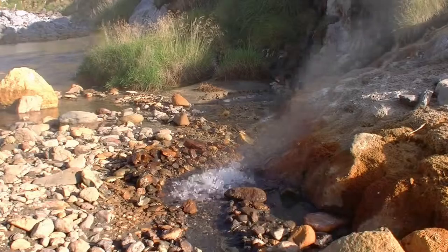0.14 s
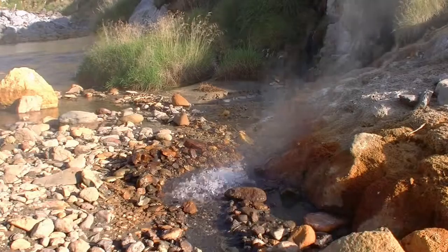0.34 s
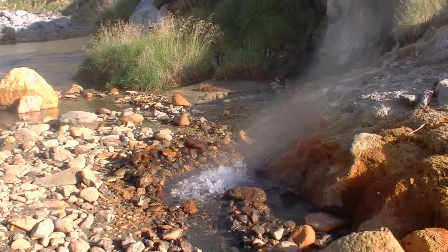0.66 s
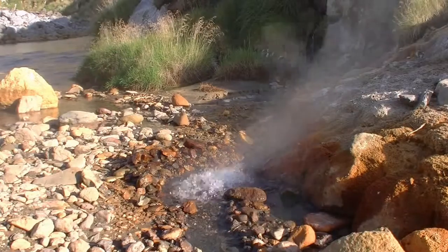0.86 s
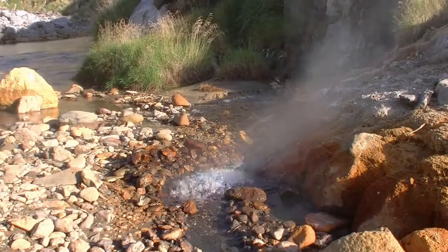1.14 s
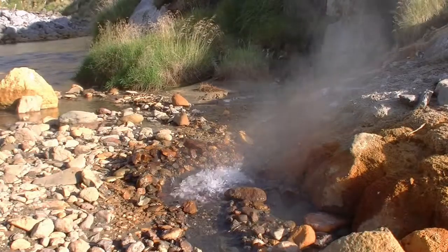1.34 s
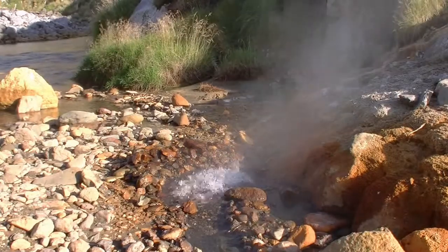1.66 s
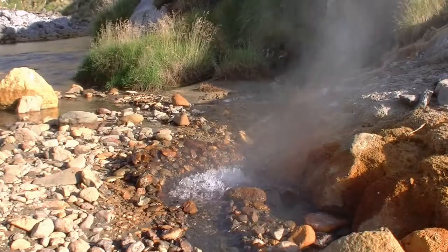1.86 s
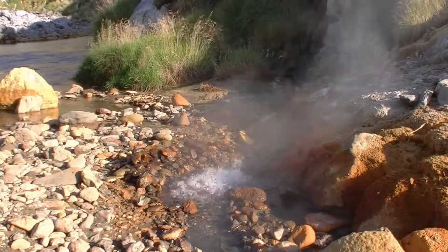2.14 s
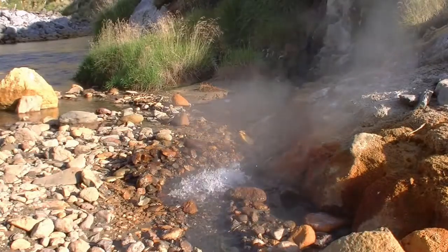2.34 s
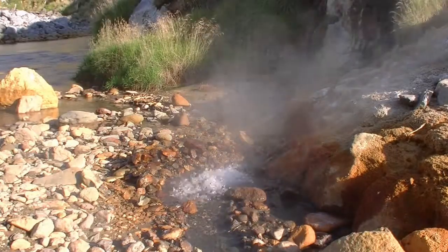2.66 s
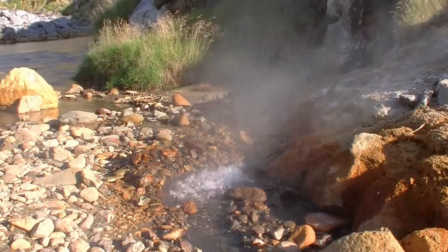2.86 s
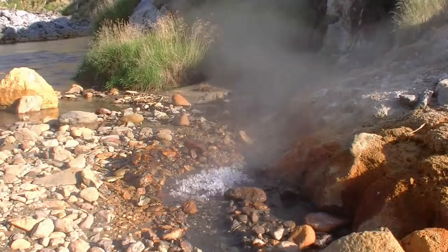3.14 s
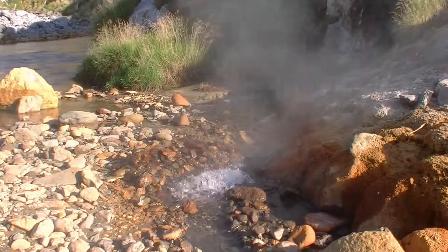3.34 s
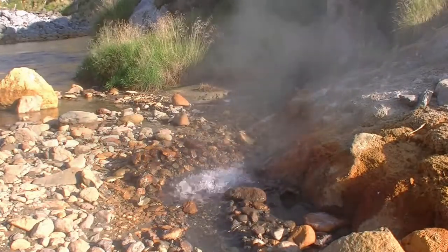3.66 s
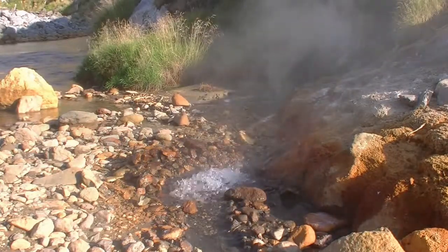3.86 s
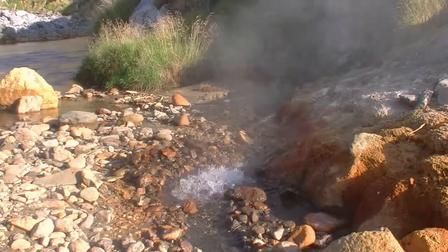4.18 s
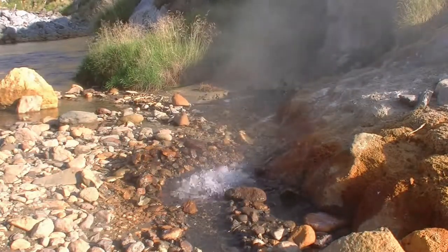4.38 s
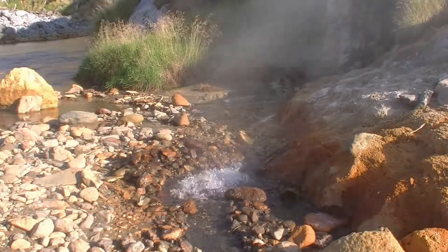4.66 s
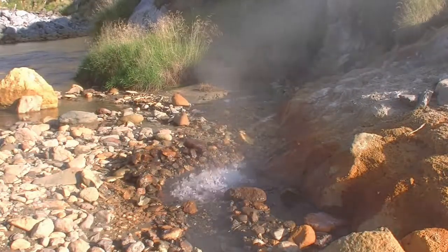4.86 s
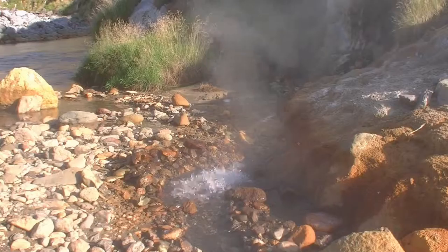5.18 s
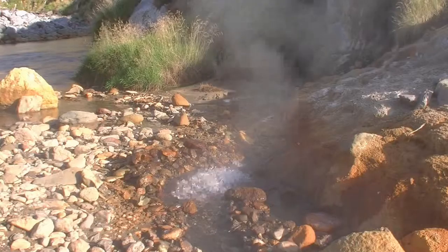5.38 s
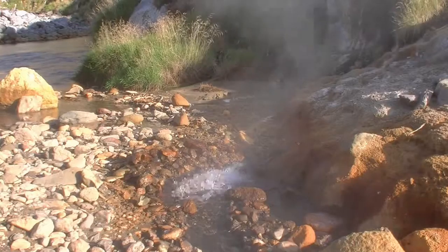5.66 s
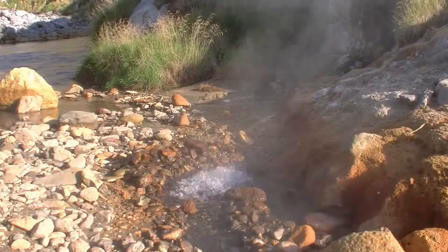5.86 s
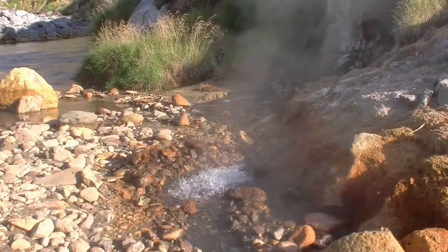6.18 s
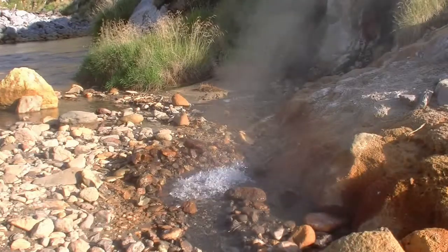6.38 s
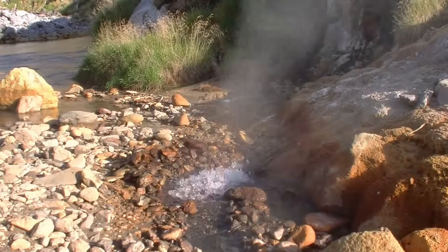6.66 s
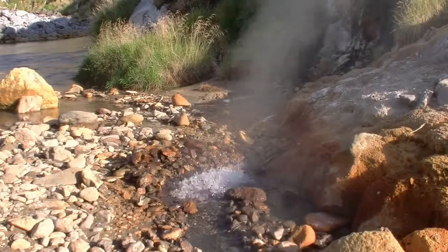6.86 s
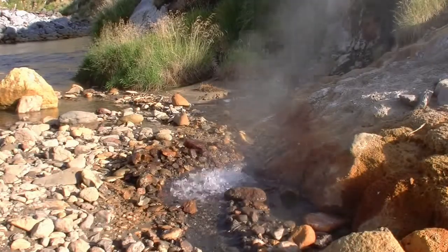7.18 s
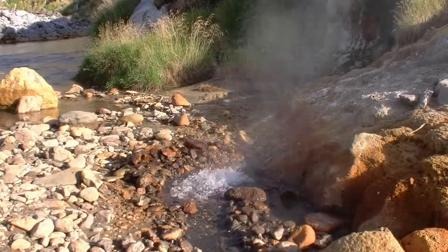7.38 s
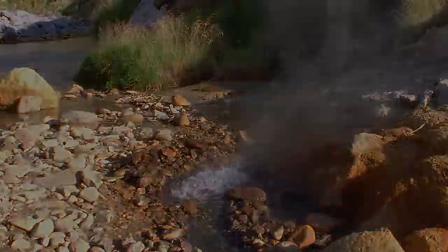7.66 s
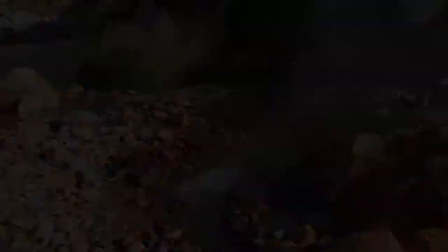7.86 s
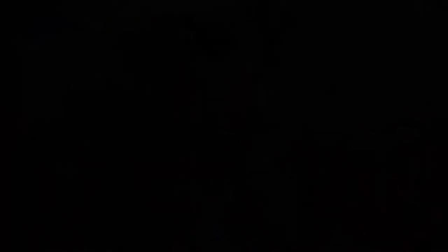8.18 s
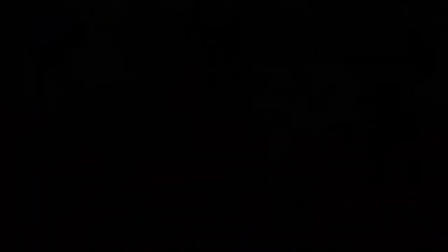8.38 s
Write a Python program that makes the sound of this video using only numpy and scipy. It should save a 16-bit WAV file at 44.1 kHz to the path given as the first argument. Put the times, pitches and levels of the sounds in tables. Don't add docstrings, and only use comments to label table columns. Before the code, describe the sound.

A hot spring boils among gravel outdoors, heard close in wide stereo. A steady, dense mid-pitched churn flutters quickly, with irregular hollow gulps popping across both sides, fizzing splashes, droplet plinks and tiny crisp spits on stone. A faint low wind brush touches the microphone at the very start. The boil stays even, then fades smoothly to silence over the last second.

```python
import sys
import numpy as np
from scipy import signal
from scipy.fft import rfft, irfft
from scipy.io import wavfile
from scipy.ndimage import uniform_filter1d

SR = 44100
rng = np.random.default_rng(int(sys.argv[2]) if len(sys.argv) > 2 else 0)


def pcm_store(signal):
    levels = np.round(np.clip(np.atleast_2d(signal), -1, 1) * 32767)
    wavfile.write(sys.argv[1], SR, levels.astype(np.int16).T)


def natural_amplitude(level_db):
    exponent = np.asarray(level_db, float) / 20
    return 10 ** exponent


N = 376173

# (time of the middle [s], peak level [dB], pitch [Hz], bearing [degrees], length [cycles])
BIG_BUBBLES = [(0.341, -14, 520.0, 60, 6.6), (0.359, -8.5, 500.0, 112, 5.2), (0.786, -17, 500.0, 59, 3.9),
               (0.806, -17, 617, 127, 9), (0.914, -13, 620.0, 85, 4.7), (1.093, -15.5, 550.0, 96, 7.6),
               (1.2, -23, 550.0, 152, 3.6), (1.214, -17, 520, 130, 7.7), (1.563, -23, 543, 180, 4.7),
               (2.144, -16.5, 530.0, 120, 9), (2.157, -8.5, 600.0, 110, 6.9), (2.42, -16, 654, 113, 10.3),
               (2.483, -11, 537, 90, 4.9), (2.772, -17, 550, 140, 7.1), (2.801, -20, 580.0, 150, 7.1),
               (2.893, -7.5, 655, 120, 7.2), (3.65, -13, 700, 140, 4.5), (3.813, -30, 720.0, 65, 6.6),
               (3.892, -13, 500.0, 69, 2.7), (3.941, -20, 540.0, 160, 5.7), (4.517, -15.5, 520.0, 41, 8.1),
               (4.806, -14, 527, 40, 5.5), (4.854, -17, 600.0, 125, 6.8), (5.329, -15, 730.0, 116, 6.8),
               (5.591, -18.5, 574, 170, 4.4), (5.625, -17, 600.0, 20, 4.3), (5.778, -22, 490.0, 64, 5.8),
               (5.8, -23, 487, 72, 7.7), (5.926, -17, 530.0, 96, 9), (6.176, -17.5, 500.0, 52, 9),
               (6.201, -19, 534, 180, 7.7), (6.442, -13, 578, 113, 5), (6.488, -20.5, 540.0, 120, 7),
               (6.668, -20, 490.0, 109, 4.7), (7.005, -19.5, 563, 180, 4.1), (7.137, -15, 540.0, 82, 4),
               (7.242, -16, 456, 115, 5.1), (7.318, -19, 686, 4, 9), (7.409, -13, 550.0, 110, 3.6),
               (7.764, -13, 460.0, 110, 5.1)]
# (time of the middle [s], peak level [dB], pitch [Hz])
CENTRAL_BUBBLES = [(0.127, -29, 506), (0.24, -21, 517), (0.296, -24, 500), (0.404, -22, 500),
                   (0.576, -23.5, 506), (1.857, -26, 530), (1.953, -24, 600), (2.181, -25, 500),
                   (2.715, -21, 620), (2.749, -27, 524), (3.922, -23, 530), (4.182, -26, 590),
                   (4.585, -25, 490), (4.742, -25, 543), (4.823, -22, 560), (4.879, -23, 540),
                   (5.1, -29, 590), (5.497, -22, 510), (5.529, -27, 540), (5.666, -30, 490),
                   (5.811, -23, 565), (6.05, -28, 533), (6.081, -23, 455), (6.228, -21, 500),
                   (6.389, -27, 540), (6.574, -24, 530), (6.769, -21, 580), (6.829, -25, 507),
                   (7.342, -21, 540), (7.633, -20, 555)]


def rms_one(x):
    return x / np.sqrt(np.mean(x ** 2) + 1e-20)


def in_time(rows):
    s, *columns = np.transpose(rows)
    return [np.interp(np.arange(N) / SR, s, c) for c in columns]


def at_hz(rows, hz, order=1):
    rows = np.array(rows)
    return np.interp(np.log(hz), np.log(rows[:, 0]), rows[:, order])


def drift(rate_hz):
    pole = np.exp(-80 * np.pi * rate_hz / SR)
    noise = rng.standard_normal(N // 40 + 2002)
    slow = signal.lfilter([1], [1, -2 * pole, pole * pole], noise)[2000:]
    return np.interp(np.arange(N) / 40, np.arange(len(slow)), rms_one(slow))


def band(x, low_hz, high_hz):
    return signal.sosfilt(signal.butter(2, [low_hz, high_hz], "band", fs=SR, output="sos"), x + 1e-18)


def colour(x, gain):
    return irfft(rfft(x, 2 * len(gain) - 2) * gain)[..., :N]


def pool():
    # (frequency [Hz], density [dB per Hz])
    mid_colour = [(25, -59), (70, -39), (150, -18), (230, -10), (285, -4.5), (520, 0), (750, -3.5),
                  (840, -8.5), (1200, -13), (1320, -16.5), (1900, -18), (2200, -16.5), (3000, -17),
                  (3400, -20.5), (4300, -27), (5500, -23.5), (8900, -27), (9700, -30.5), (14100, -38.5),
                  (15800, -44)]
    # (frequency [Hz], density [dB per Hz])
    side_colour = [(25, -56), (65, -56), (261, -8.5), (498, 0.5), (1210, -9), (2500, -23.5), (3600, -33),
                   (5300, -41.5), (5800, -100), (7200, -77), (7700, -50), (9600, -41), (13700, -44),
                   (15800, -48)]
    # (frequency [Hz], share [-1..1])
    in_phase = [(60, -0.12), (160, -0.41), (400, -0.019), (1400, 0.14), (1850, -0.35), (2500, .12),
                (4300, 0.27), (8000, .1), (10000, 0.67), (12000, 0.68), (15000, 0.86)]
    # (frequency [Hz], share [-1..1])
    quarter_cycle = [(100, -.15), (190, -.15), (260, .18), (390, -.05), (690, 0.17), (1400, -.1),
                     (1750, -.08), (2070, .27), (2600, -.05), (3450, -.36), (4300, -.04), (9000, .13),
                     (15000, .05)]

    hz = np.maximum(np.fft.rfftfreq(2 ** 19, 1 / SR), 1)
    front, other = swarm()
    coherence = np.clip(at_hz(in_phase, hz), -0.99, 0.99) + 1j * at_hz(quarter_cycle, hz)
    independent = np.sqrt(np.maximum(1 - abs(coherence) ** 2, 0))
    side_gain = natural_amplitude(at_hz(side_colour, hz) + 5.5)
    mid = colour(front, natural_amplitude(at_hz(mid_colour, hz)))
    side = colour(front, side_gain * coherence) + colour(other, side_gain * independent)
    return np.array([mid + side, mid - side]) * natural_amplitude(-29.5) / np.std(mid)


def swarm():
    # (frequency [Hz], rate [collapses per s in a third octave], size spread [dB], flicker [dB])
    bubble_sizes = [(59.9, 900, 0, 1.3), (500, 2200, 0.68, -0.1), (1996, 4500, 1.5, 0.62),
                    (5023, 5500, 1, 0.71), (14050, 8000, -1.5, 0.8)]
    layer_hz = [600, 2300, 7000]

    levels = effort_db()
    levels[0] += swell_at_gulps()
    surge = 0.14 * drift(15) + 0.53 * drift(25) + 0.17 * drift(120)
    edges_hz = 32 * 2 ** (np.arange(28) / 3)
    near = drift(22)
    out = 0
    for low, high in zip(edges_hz, edges_hz[1:]):
        hz = np.sqrt(low * high)
        born = np.cumsum(rng.exponential(1, N // 4) * SR / at_hz(bubble_sizes, hz)).astype(int)
        born = born[born < N]
        directions = rng.standard_normal((len(born), 2))
        excess = np.minimum(rng.exponential(1, len(born)), 5)
        strength = natural_amplitude(at_hz(bubble_sizes, hz, order=2) * excess)
        clicks = np.zeros((2, N))
        clicks[:, born] = (directions * strength[:, None]).T

        place = np.interp(np.log(hz), np.log(layer_hz), range(3))
        level_db = sum(np.clip(1 - abs(place - k), 0, 1) * levels[k] for k in range(3))
        near = 0.72 * near + 0.59 * drift(22)
        shake_db = at_hz(bubble_sizes, hz, order=3) * (near + surge)
        ringing = rms_one(band(clicks, low, high))
        out = out + np.sqrt(high - low) * ringing * natural_amplitude(level_db + shake_db)
    return out


def effort_db():
    # (time [s], level [dB])
    boil = [(0, -31.5), (.33, -31.5), (.55, -31), (.8, -30.5), (1.4, -32), (1.55, -30.5), (2.3, -31),
            (2.8, -30), (3.25, -32.5), (3.95, -30), (4.3, -30.5), (4.8, -30), (5.15, -31.5), (5.65, -29),
            (6.0, -31.5), (6.2, -30), (6.75, -30.5), (7.35, -29.5), (7.6, -32), (8.4, -28)]
    boil_share = [0.81, 0.26, 0.12]
    # (time of the top [s], extra level [dB])
    splashes = [(0.03, 0.5), (0.17, 1), (0.3, 1), (0.44, 1.5), (0.6, 1.5), (1.85, 2.5), (2.3, -1.3),
                (2.9, -1.4), (3.5, 0.3), (4.5, 1), (5.4, 1.2), (6.8, -1.3), (7.95, 1), (0.8, 5.5),
                (1.05, 3), (1.2, 2.5), (1.4, 4.5), (1.62, 2), (2.1, 1.5), (2.55, 3), (3.2, 0.5),
                (3.85, 1.5), (4.2, 1.5), (4.8, 2), (5.06, 2.5), (5.72, 1), (5.96, 3), (6.16, 2.5),
                (6.458, 2.3), (7.1, 0.4), (7.368, 0), (7.7, 0)]
    splash_share = [0.11, 0.46, 0.61]
    # (time of the top [s], extra level [dB])
    spray_jets = [(0.53, 2.5), (1.02, 0.5), (1.18, 1.5), (1.58, -1), (1.67, 2.5), (2.18, 1), (2.47, 1.5),
                  (3.85, 1.5), (5.01, 1.5), (5.24, 0), (5.695, 1.5), (5.745, 5), (5.97, -1.5), (6.35, 1.5),
                  (7.15, 1)]
    rise_s, fall_s, jet_s = 0.12, 0.11, 0.015

    vigour = in_time(boil)[0]
    t = np.arange(0, N, 64) / SR
    thrown = sum(db * np.exp(-((t - s) / np.where(t < s, rise_s, fall_s)) ** 2) for s, db in splashes)
    jets = sum(db * np.exp(-((t - s) / jet_s) ** 2) for s, db in spray_jets)
    thrown = np.interp(np.arange(N) / SR, t, thrown - thrown.mean())
    jets = np.interp(np.arange(N) / SR, t, jets)
    swing = np.outer(boil_share, vigour - vigour.mean())
    return swing + np.outer(splash_share, thrown) + np.outer([0, 0.27, 1.1], jets)


def swell_at_gulps():
    lift_db, lift_s = 1.5, 0.0059
    marks = np.zeros(N)
    marks[[int(row[0] * SR) for row in BIG_BUBBLES + CENTRAL_BUBBLES]] = 1
    t = np.arange(-1500, 1501) / SR
    bell = np.exp(-(t / lift_s) ** 2)
    return lift_db * np.minimum(signal.fftconvolve(marks, bell, "same"), 1)


def gulps():
    out = np.zeros((2, N))
    for s, peak_db, hz, bearing, cycles in all_gulps():
        mid, side = np.cos(np.radians(bearing)), np.sin(np.radians(bearing))
        pop = burst(hz, max(cycles, 1), rise=0.053)
        pair = natural_amplitude(peak_db - 2.5) * np.outer([mid + side, mid - side], pop)
        add(out, s - 0.329 * len(pop) / SR, pair)
    return band(out, 150, 4500)


def all_gulps():
    # (time of the middle [s], peak level [dB], pitch [Hz])
    deep_bubbles = [(1.005, -30, 278), (1.154, -30.5, 280), (1.846, -36, 310), (2.217, -33, 296),
                    (3.997, -33, 306), (4.192, -37, 300), (4.237, -32, 290), (4.492, -31, 292),
                    (4.787, -32, 288), (5.271, -31, 300), (5.361, -41, 308), (5.425, -33, 310),
                    (6.178, -36, 290), (6.477, -39, 300), (6.912, -34, 284), (7.143, -35, 286),
                    (7.515, -37, 290), (7.837, -29, 300), (7.922, -33, 290), (8.017, -34, 280)]
    # (time [s], peak level [dB], pitch [Hz])
    droplets = [(0.0927, -30, 1430), (0.1705, -29, 2780), (0.5033, -28, 2240), (0.816, -27, 2680),
                (0.8709, -28, 2220), (1.2062, -26, 2670), (1.2496, -28, 2920), (1.3887, -24, 2050),
                (1.5484, -26, 2960), (1.5828, -30, 1360), (1.5998, -26, 2620), (1.6437, -28, 1980),
                (1.7195, -31, 2560), (1.7514, -28, 2710), (1.8253, -26, 2090), (2.588, -31, 2370),
                (2.7716, -28, 2650), (2.9991, -33, 1660), (3.7618, -25, 2630), (3.8586, -28, 1330),
                (4.0307, -28, 1510), (4.2951, -27, 2730), (4.3316, -25, 2170), (4.4099, -27, 2240),
                (4.5276, -28, 2250), (4.632, -26, 2220), (4.6927, -23, 2240), (4.798, -31, 2200),
                (4.8973, -31, 2250), (4.9686, -32, 2410), (5.0315, -31, 2210), (5.1178, -27, 2050),
                (5.2006, -30, 2980), (5.5458, -29, 2810), (5.7369, -26, 2790), (5.902, -29, 3260),
                (5.941, -28, 1410), (6.3121, -27, 1800), (6.3699, -24, 1720), (6.4233, -20, 2200),
                (6.4787, -26, 2350), (6.7615, -24, 2220), (7.0708, -31, 1360), (7.0988, -30, 2700),
                (7.2893, -29, 2210)]

    rows = list(BIG_BUBBLES)
    # rows, trim [dB], length [cycles]
    for kind, trim_db, cycles in [(CENTRAL_BUBBLES, 2, 5.62), (deep_bubbles, 4.5, 8.96), (droplets, -4.5, 5.5)]:
        rows += [(s, db + trim_db, hz, 0, cycles) for s, db, hz in kind]
    return rows


def burst(hz, cycles, rise):
    u = np.linspace(0, 1, int(cycles / hz * SR) + 2)
    swell = np.sin(np.pi * u ** 0.52) ** 2
    return swell * np.sin(2 * np.pi * cycles * (u + rise * (u * u - u)))


def add(out, s, pair):
    i = round(s * SR)
    out[:, i:i + pair.shape[1]] += pair


def spits():
    # (time [s], peak level [dB], pitch [Hz])
    stone_drops = [(0.3568, -26.5, 6100.0), (0.3849, -30, 7100.0), (0.5062, -25, 5800.0),
                   (0.6627, -30, 6500.0), (0.779, -27, 7100.0), (0.8558, -27, 7700.0), (1.051, -29, 6700.0),
                   (1.1654, -32, 7600.0), (1.3211, -39, 6900.0), (1.5498, -24.5, 6700.0),
                   (1.649, -26, 6500.0), (1.7008, -29, 8000.0), (1.8987, -35, 7100.0),
                   (2.1604, -32, 6500.0), (2.4452, -27, 8400.0), (2.5403, -28, 6000.0),
                   (2.6361, -29.5, 7800.0), (2.6738, -32, 7400.0), (2.7154, -29, 6800.0),
                   (2.9163, -31, 7400.0), (3.2458, -28, 7400.0), (3.5816, -33, 7000.0),
                   (3.7421, -33.5, 8100.0), (3.7985, -29, 6700.0), (3.8054, -28, 6500.0),
                   (4.166, -35, 6400.0), (4.3681, -32, 8300.0), (4.6493, -27.5, 6100.0),
                   (5.1072, -32, 7300.0), (5.2383, -28, 8600.0), (5.5569, -28, 5700.0),
                   (5.6966, -26.5, 8000.0), (5.7828, -33, 7200.0), (5.9287, -31.5, 6400.0),
                   (5.9754, -30, 7500.0), (5.9873, -27, 6700.0), (6.4384, -28, 6500.0),
                   (6.5088, -30, 5500.0), (6.6634, -33, 6400.0), (6.7622, -29, 7700.0),
                   (6.807, -28, 6400.0), (7.0986, -38, 6700.0), (7.2374, -33, 5600.0),
                   (7.3413, -33, 6700.0), (7.4041, -34, 7300.0), (7.8452, -27, 6100.0),
                   (7.9869, -32, 6100.0)]

    out = np.zeros((2, N))
    t = np.arange(90) / SR
    for s, peak_db, hz in stone_drops:
        ring = np.sin(2 * np.pi * hz * t) * np.exp(-t * hz / 1.4)
        crack = 0.25 * np.sin(2 * np.pi * 1.8 * hz * t) * np.exp(-t / 0.000073)
        pair = ring * [[1.1], [0.9]] + crack * [[1.3], [0.5]]
        add(out, s - 0.0002, natural_amplitude(peak_db + 6.5) * pair)
    return band(out, 3500, 14500)


def wind():
    # (time [s], level [dB])
    breeze = [
        (0, -52),
        (.15, -49),
        (.3, -47),
        (.45, -83.5),
        (8.53, -67),
    ]

    lumps = natural_amplitude(in_time(breeze)[0] + 2.6 * drift(12))
    rumble = band(band(rng.standard_normal(N), 90, 200), 90, 400)
    return rms_one(rumble) * lumps * [[1], [-1]]


def scene():
    return pool() + gulps() + spits() + wind()


def thin_treble(x):
    # (frequency [Hz], left over usual level [dB], right over usual level [dB])
    gate_levels = [(8000, -14, -12), (9500, -9, -4), (11000, -6, -1), (12500, -4.5, .3), (14000, -3, 1.3),
                   (15000, -1, 2.5), (15800, 2, 4)]
    lead = 705

    window = np.sin(np.pi * (np.arange(2048) + 0.5) / 2048)
    hz, _, z = signal.stft(np.pad(x, [(0, 0), (lead, 0)]), SR, window, nperseg=2048, noverlap=1024)
    kept = np.ones(z.shape)
    for k, bins in enumerate([7, 20]):
        power = uniform_filter1d(np.abs(z[k]) ** 2, size=bins, axis=0)
        usual = uniform_filter1d(uniform_filter1d(power, size=61, axis=1), size=21, axis=0)
        threshold = usual * natural_amplitude(2 * at_hz(gate_levels, hz + 1, order=k + 1))[:, None]
        kept[k] = (power > threshold) | (hz < 8000)[:, None]
    return signal.istft(z * kept, SR, window, nperseg=2048, noverlap=1024)[1][:, lead:N + lead]


def top_cut(x):
    return signal.sosfilt(signal.butter(12, 15780, fs=SR, output="sos"), x)


def record(dry):
    fade_from_s, silent_at_s = 7.36, 8.433
    left = np.clip((silent_at_s - np.arange(N) / SR) / (silent_at_s - fade_from_s), 0, 1)
    mix = thin_treble(dry) * left ** 0.93
    return top_cut(mix)


dry = scene()
out = record(dry)
pcm_store(out)
```